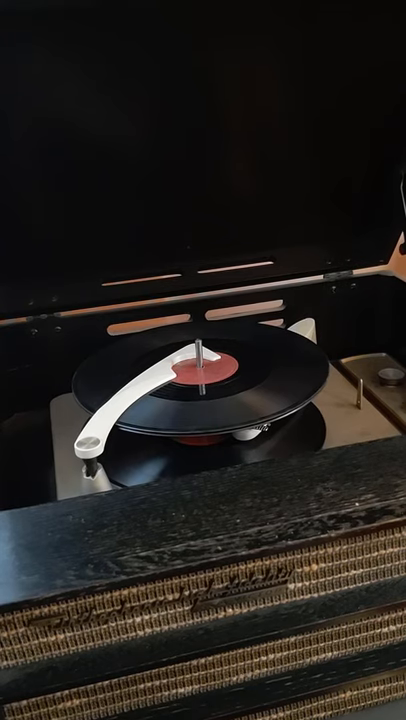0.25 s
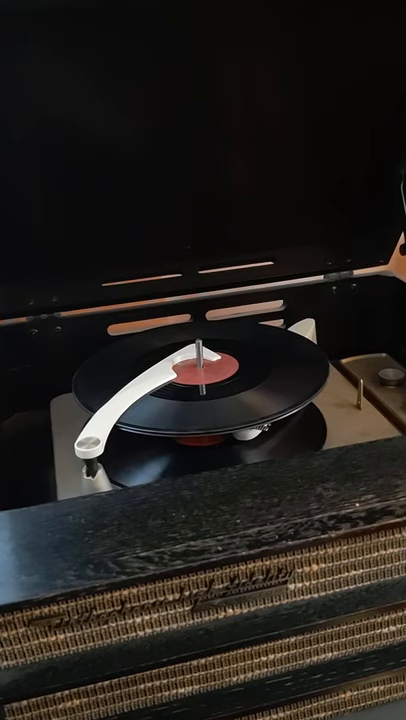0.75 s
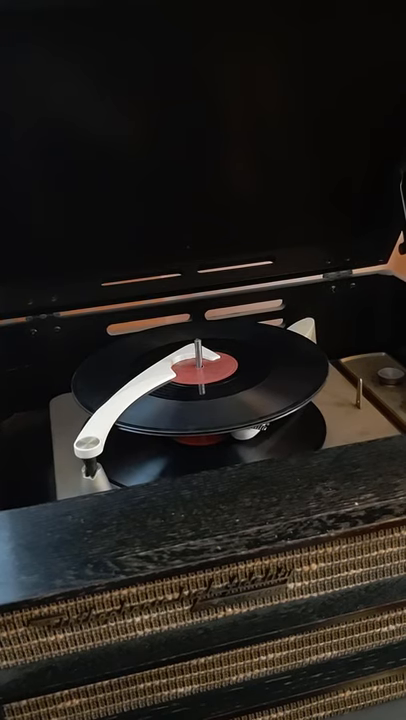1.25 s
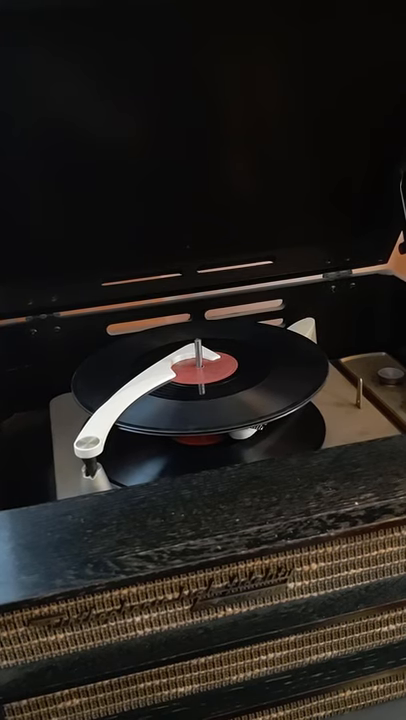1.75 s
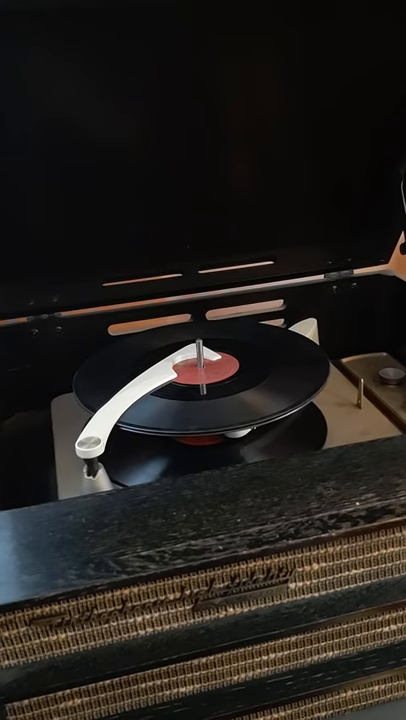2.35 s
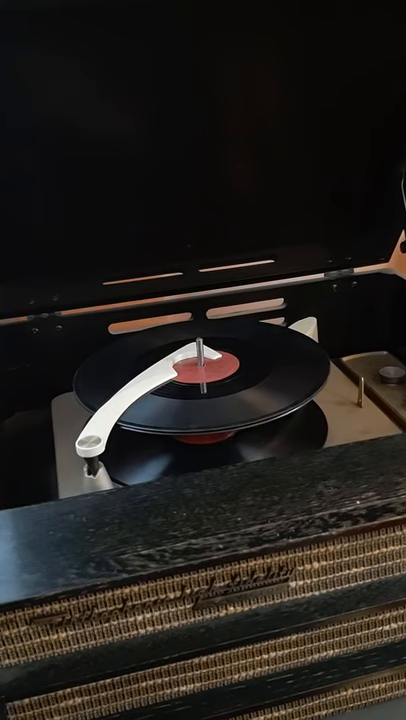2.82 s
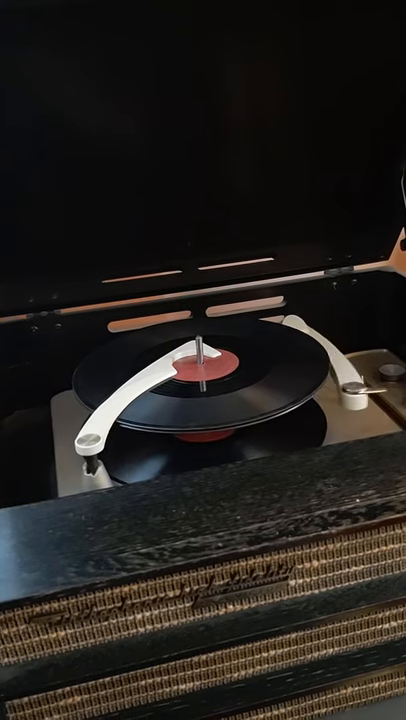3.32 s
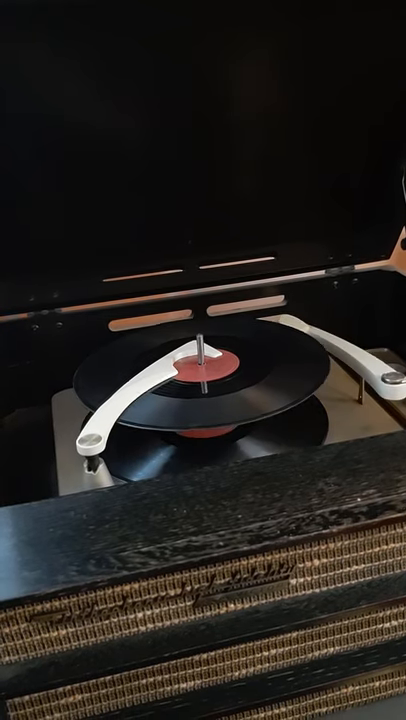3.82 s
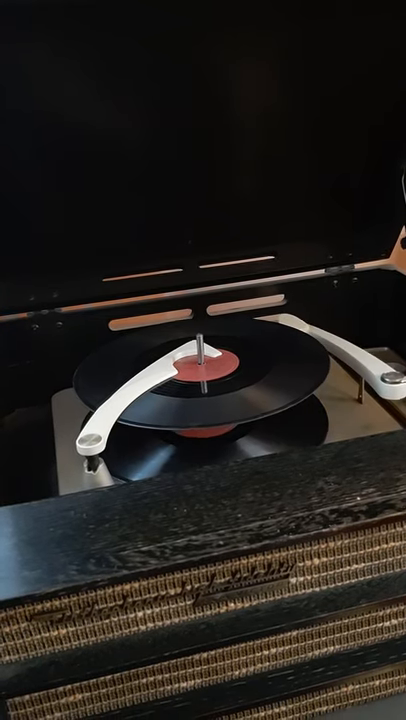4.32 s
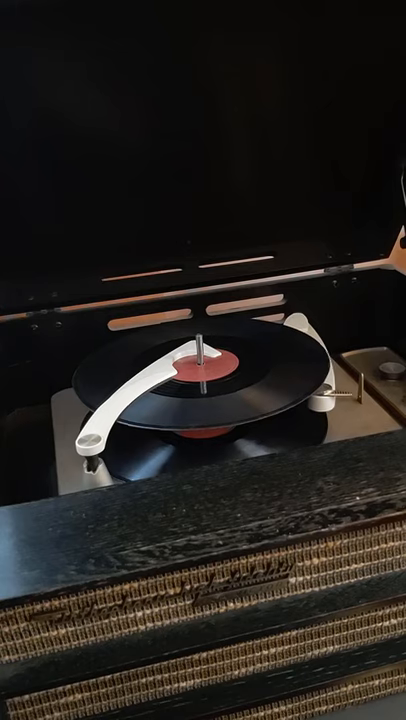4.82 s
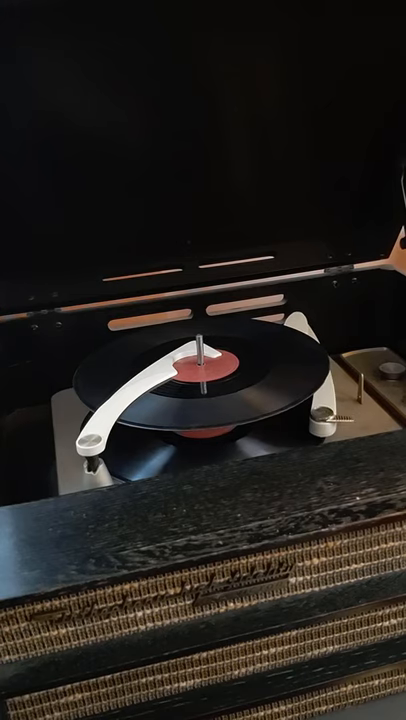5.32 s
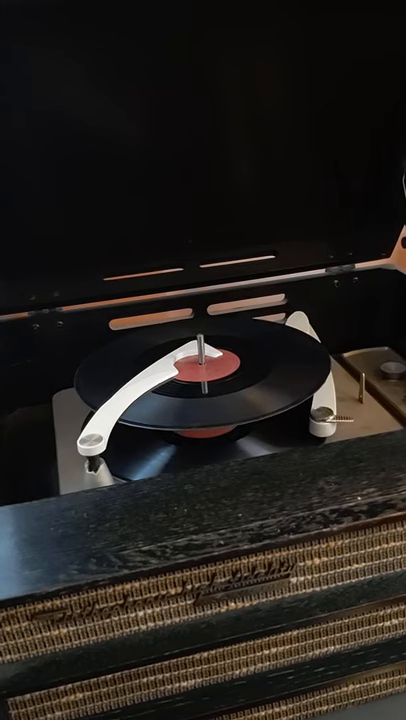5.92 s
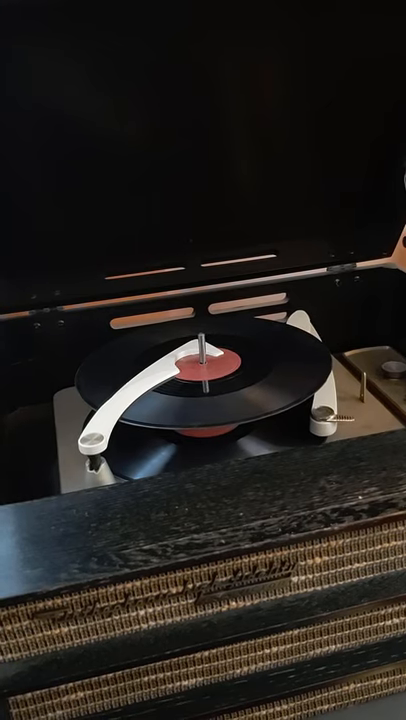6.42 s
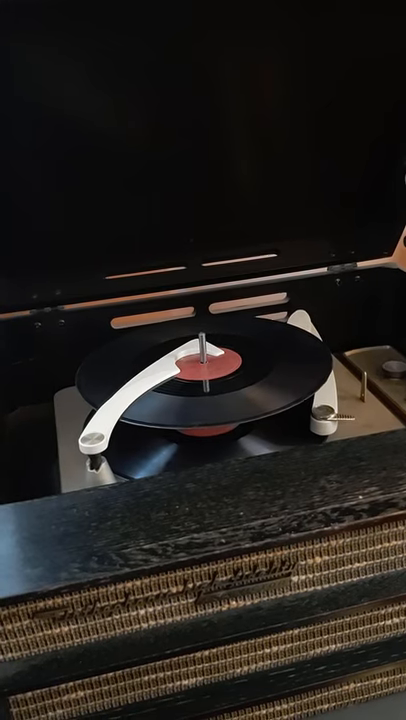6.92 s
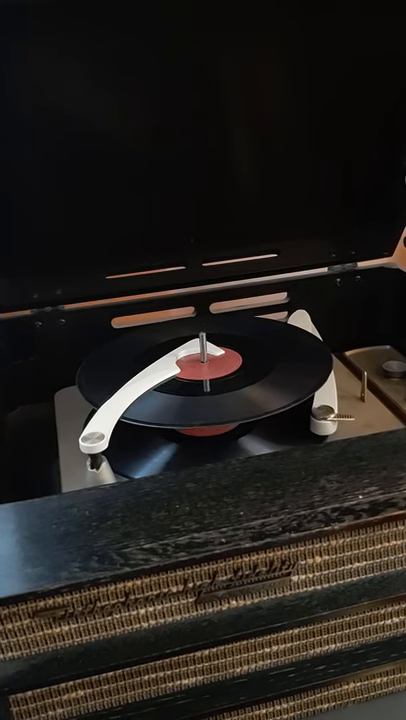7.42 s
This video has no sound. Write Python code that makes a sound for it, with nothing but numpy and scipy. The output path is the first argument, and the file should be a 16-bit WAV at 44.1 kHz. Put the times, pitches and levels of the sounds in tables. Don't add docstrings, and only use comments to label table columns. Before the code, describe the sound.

Low mains hum and motor rumble run throughout. Needle crackle with dull bumps grows into a rough, jerky drag across grooves with loud pops, then stops. Small metallic ticks lead to a double hard slap of a falling disc, which shivers flat. After sparse clicks, one sharp latch and a bassy needle thump bring quiet crackle and thin, fluttering metallic rubbing. Close stereo pickup, small dry room.

```python
import sys
import numpy as np
from scipy import signal
from scipy.fft import rfft, irfft, next_fast_len
from scipy.io import wavfile
from scipy.ndimage import uniform_filter1d

SR = 44100
rng = np.random.default_rng(int(sys.argv[2]) if len(sys.argv) > 2 else 0)


def dump_mix(stems):
    frames = np.atleast_2d(stems).T
    limited = np.clip(frames, -1, 1)
    pcm = np.round(limited * 32767).astype(np.int16)
    wavfile.write(sys.argv[1], SR, pcm)


def ratio(d):
    e = np.asarray(d, float) / 20
    return 10 ** e


N = 337532
GRID_HZ = np.fft.rfftfreq(16384, 1 / SR)
SIDES = np.array([[.5], [-.5]])
BASS_PAN_DB = -2
LIFT_S, SEAT_S = 2.64, 5.585
SETTLE_S = (3.932, 4.2)

# time in seconds, level in dB.
SCRATCH = [
    [(0.0, -59.5), (0.26, -54.5), (0.41, -66), (0.77, -60.5), (1.0, -58), (1.15, -61.5), (1.24, -101),
     (1.38, -64), (1.5, -104)],
    [(1.53, -62), (1.56, -56), (1.602, -79)],
    [(1.604, -46), (1.7, -49), (2.04, -44), (2.17, -39.5), (2.31, -43.5), (2.37, -40.5), (2.615, -38.5),
     (2.65, -47), (2.85, -69.5)],
    [(5.484, -53), (5.505, -72), (5.512, -51), (5.526, -58), (5.534, -62), (5.542, -56), (5.553, -52),
     (5.568, -48.5), (5.584, -36.5)],
    [(5.586, -50.5), (5.66, -56.5), (5.79, -58.5), (6.12, -58.5), (6.33, -66), (6.6, -69.5), (6.85, -68.5),
     (7.65, -67)],
]
# time in seconds, peak in dB, thump relative to it in dB.
POPS = [(0.0873, -38, 16), (0.177, -39, -22), (0.2292, -36.5, 2), (0.259, -37.5, 2), (0.7497, -41.5, 12),
        (0.8783, -41.5, 4), (0.9147, -41, 8), (0.9743, -39, -20), (1.0229, -38, -20), (1.143, -43, -18),
        (1.5632, -38, 19), (1.6064, -28.5, -20), (1.7805, -35, -10), (1.9592, -32, 26), (1.9933, -29.5, 12),
        (2.0678, -25.5, 10), (2.128, -26.5, 20.5), (2.181, -23.5, -16), (2.2747, -26.5, 7),
        (2.3185, -28.5, 0), (2.3401, -21.5, -10), (2.359, -23, -5), (2.479, -25.5, -8), (2.583, -22.5, 12),
        (5.4947, -43, -8), (5.7643, -37, -19), (5.983, -29.5, -20), (6.0812, -31.5, -20), (2.4334, -32, 19),
        (7.35, -35, 9), (0.108, -43, -2), (0.135, -42, -10), (0.208, -51, 0), (0.275, -42, -6),
        (0.472, -49.5, 0), (2.665, -45, -5), (0.835, -50, 4), (1.68, -54, 0), (1.718, -40, 17),
        (1.739, -36.5, 0), (1.835, -44, -3), (1.847, -42, 4), (1.937, -33, -2), (2.005, -46, 9),
        (2.026, -36.5, 29), (2.089, -35, 3), (2.097, -32, 6), (2.151, -33, 2), (2.161, -27.5, -7),
        (2.21, -30, 4), (2.237, -33, 4), (2.372, -23.5, 6), (2.56, -29, 19), (2.567, -30, -2),
        (2.629, -34, -4), (2.685, -37, -6), (5.522, -40, -10), (5.54, -40, -10), (5.555, -35, -8),
        (5.587, -41, 27.5)]
# crest in seconds, rumble in dB, dying time in seconds.
WARPS = [(0.0, -33.5, 0.0084), (0.116, -39.5, 0.087), (0.298, -46, 0.3), (1.0, -46.5, 0.11),
         (1.15, -44.5, 0.027), (1.76, -33.5, 0.031), (2.005, -25.5, 0.031), (2.144, -32.5, 0.053),
         (2.36, -28, 0.054), (2.46, -40, 0.049), (2.545, -40, 0.025), (2.67, -45.5, 0.073),
         (1.66, -36.5, 0.058), (2.075, -28.5, 0.033), (2.23, -39, 0.028), (0.89, -43.5, 0.023),
         (0.56, -46.5, 0.029), (5.789, -38, 0.035), (1.945, -30.5, 0.014), (6.55, -49, 0.012),
         (6.69, -49.5, 0.055), (7.01, -53, 0.69), (7.63, -51.5, 0.081)]
# start in seconds, rumble in dB, dying time in seconds.
JOLTS = [
    (0.803, -42.5, 0.17),
    (1.56, -37.5, 0.048),
    (1.605, -21.5, 0.018),
    (5.584, -31.5, 0.038),
]
# pitch in Hz, width in Hz, level in dB.
BASS = [(78, 128, -2), (110, 15.4, -0.5), (135, 39, 0.5), (177.3, 36, 0.5), (232.4, 27, -25),
        (251.4, 21.4, 0.5), (302.5, 32, 0.5), (414, 64, -12.5), (535, 76, -21)]
# pitch in Hz, width in Hz, level in dB.
CONE = [(438, 150, -4.5), (542.4, 30, 8), (670, 32, 1.5), (1120, 224, 1.5), (1310, 140, -2.5),
        (1660, 280, 0.5), (1903, 203, 8), (2080, 270, 2.5), (2396, 210, -0.5), (2744, 730, -6.5),
        (3280, 320, -9.5), (3800, 520, -30)]
# pitch in Hz, width in Hz, level in dB.
SNAP = [(492, 204, 6), (1270, 580, 6.5), (1950, 570, 12), (3200, 2500, -24.5)]
# frequency in Hz, left minus right in dB.
SPEAKER_PAN = [(60, -25), (130, 15.5), (290, -11.5), (640, 11), (1410, -17.5), (3100, 1), (6820, 11.5),
               (15000, -7)]

# time in seconds, level in dB.
RUB = [
    [(0.0, -67.5), (0.55, -71.5), (0.92, -65.5), (1.36, -71.5), (1.99, -66), (2.67, -67), (2.82, -83),
     (2.9, -73)],
    [(5.34, -73.5), (5.62, -61), (5.76, -58), (5.91, -58.5), (6.36, -63.5), (6.75, -62.5), (6.97, -64.5),
     (7.65, -62.5)],
]
# frequency in Hz, level in dB.
STACK_COLOUR = [(1650, -34.5), (2800, 6), (4000, 5.5), (5400, 2), (7000, -1), (9000, -2.5), (12000, -1),
                (15900, -8.5)]
# frequency in Hz, level in dB.
DROPPED_COLOUR = [(2000, -29), (3000, 2.5), (8000, 1.5), (15900, 3)]
# pitch in Hz, width in Hz, level in dB.
RUB_RINGS = [(3600, 120, -4), (4000, 110, 0), (4250, 200, -3), (4850, 150, -7), (5350, 110, -3),
             (5800, 300, -13), (6330, 150, -1), (6650, 120, -10), (7080, 110, -2), (7750, 130, -8),
             (8770, 130, -9), (9100, 100, -12), (9430, 100, -10), (9960, 130, -13), (10500, 200, -17),
             (11100, 130, -12), (11750, 200, -11), (12300, 200, -17), (13200, 180, -11), (13750, 220, -9),
             (14700, 150, -10), (15400, 500, -16)]
# frequency in Hz, left minus right in dB.
RUB_PAN = [(60, -13), (180, -25), (550, 8), (1650, -24), (4970, 4), (15000, -5.5)]
# time in seconds, level in dB.
SQUEAL = [(0.0, -82), (0.1, -63), (0.26, -65), (0.3, -71), (0.66, -62), (0.8, -70), (1.11, -70.5),
          (1.5, -73), (1.9, -88)]

# multiple of the mains frequency, rms in dB, left minus right in dB.
HUM = [(1, -68, -3), (2, -67.5, 0), (3, -64, -1.5), (4, -82.5, 6), (5, -59, -4.5), (7, -72.5, 4.5),
       (9, -88.5, 15.5), (11, -84, 13.5)]
# frequency in Hz, level in dB per Hz.
FLOOR = [(18, -52.5), (30, -22), (174, -13.5), (245, -12), (302, -15), (327, -17), (354, -19.5),
         (425, -14.5), (485, -21), (582, -18.5), (863, -27.5), (1950, -24.5), (2810, -34), (5280, -37.5),
         (15900, -46)]
# frequency in Hz, correlation from -1 to 1.
FLOOR_SAME = [(60, -0.0074), (150, 1), (380, 0.34), (950, 0.078), (2380, -0.28), (5980, -0.17),
              (15000, -0.58)]
# frequency in Hz, left minus right in dB.
FLOOR_PAN = [(60, -3.0), (150, -1.5), (380, -3.5), (950, -2.0), (2380, -5.5), (5980, 2.0), (15000, -2.0)]

# start in seconds, peak in dB, body
# relative in dB, ring in Hz.
TICKS = [(0.257, -51.5, 8, 1790), (0.634, -66, -5, 1940), (0.75, -56, 4, 1830), (0.9728, -53.5, 9.5, 1950),
         (1.49, -57, -13, 3920), (2.5504, -47.5, -12, 1920), (2.726, -54, 12.5, 1830),
         (3.0335, -58, -1.5, 2000), (3.0774, -60, -1, 1830), (3.152, -53, -6.5, 1900),
         (3.23, -66.5, 1, 1330), (3.345, -59, -24, 1810), (3.379, -59, -17, 2180), (3.468, -58, -7, 1560),
         (4.204, -62, 0, 991), (4.4013, -54.5, -5, 1860), (4.458, -55, -8, 2010), (4.527, -55, -25, 5200),
         (4.644, -52, -5, 1030), (4.776, -49.5, -4, 5200), (4.429, -59.5, -5, 7250),
         (4.6315, -63, -15, 5300), (5.196, -65.5, -11, 1830), (5.262, -74, -5, 1830),
         (2.865, -60.5, 7.5, 5200), (3.21, -61.5, 0.5, 2230), (0.0865, -55.5, 4, 1860),
         (0.18, -55.5, 5, 1900), (0.23, -55, 3, 1920), (0.462, -57, 1, 1900), (0.723, -60, 2, 1900),
         (0.805, -66, -5, 1880), (1.171, -69, -11, 1880), (2.578, -50, -12, 6340), (6.51, -57.5, 5, 1890),
         (6.79, -57, 4.5, 1900), (7.28, -57, 2, 1890), (4.9522, -59.5, 0, 1760), (5.145, -60, -1, 880),
         (5.2776, -65, 10.5, 1810), (5.305, -56.5, -4, 1105), (7.1274, -53, -18, 6340)]
# start in seconds, peak in dB, body and edge relative in dB, ring in Hz.
KNOCKS = [(1.533, -48, -5, -8, 1740), (2.8235, -50, 1.5, -3.5, 1505), (3.602, -40, -6.5, -8, 4190),
          (4.2925, -46, -1.5, -31, 1380), (4.282, -57, 3.5, -9, 3650), (5.984, -46.5, 8.5, -25, 3310),
          (3.666, -51, 8, -30, 1200), (3.679, -38.5, -10, -9.5, 4210), (4.6781, -33.5, -6.5, -7.5, 2200),
          (4.803, -46.5, 1.5, -7.5, 1714), (5.3547, -58, -19, 0.5, 3610), (5.4064, -54, -8, 8, 7200),
          (5.677, -28.5, -10.5, -5, 2670), (5.755, -41.5, -3, -5, 1770), (5.765, -39, 1, 1.5, 1830),
          (5.789, -49, 10, 5, 1880), (6.0815, -39.5, -7, -13, 4170), (7.3495, -43.5, -7, -16, 1850)]
# start in seconds, peak in dB, body and edge relative in dB,
# ring in Hz.
DROP = [(3.685, -20.5, -6, -1, 1830), (3.6988, -25, -7.5, -35.5, 1830), (3.6906, -24, -16.5, -4, 1720),
        (3.7105, -33, -0.5, -9.5, 1764), (3.724, -38.5, -3, -5.5, 1830), (3.748, -31, -3.5, -1.5, 1120),
        (3.8002, -21, -5, -5.5, 1720), (3.821, -34.5, 5, 2, 1720), (3.847, -31, -0.5, 3.5, 910),
        (3.907, -51.5, 12, 17, 1200), (3.9443, -36.5, 3, 2.5, 2955), (4.004, -35.5, -6, -1, 990),
        (4.035, -48, 7, -12, 1470), (4.047, -61, -1, -7, 1120), (4.058, -60, 13, -48, 900),
        (4.088, -44, -2, -25, 2230), (3.742, -29, -8, 2, 1680), (3.7925, -18.5, -5.5, 2, 1793),
        (3.8417, -26.5, -13, 4, 6340), (3.893, -38, 1, 11, 1210), (3.9367, -35, 0.5, 6.5, 2230),
        (3.9646, -29, -2, 2, 2210), (3.983, -34.5, -7, 5, 1950), (3.9947, -27.5, -7, -0.5, 2270),
        (4.022, -35.5, 3, 0, 2254)]
# time in seconds, level in dB.
SKID = [(3.681, -49), (3.79, -58), (3.87, -57), (3.93, -60), (4.045, -54.5), (4.13, -75)]
# start in
# seconds, pitch in Hz, level in dB, t60 in seconds.
LEVERS = [(4.294, 3610, -47, 0.045), (4.294, 2810, -53, 0.045), (4.293, 1690, -57, .15),
          (4.294, 2130, -56, .07), (4.46, 2140, -62, .06), (4.529, 5250, -65, 0.04), (4.679, 1825, -55, .2),
          (4.679, 4710, -51, 0.097), (4.679, 5416, -48, .09), (5.679, 2760, -38, 0.06),
          (4.679, 800, -52, 0.091), (4.803, 1830, -50, .15), (4.803, 2700, -58, .1),
          (5.677, 1965, -40, 0.11), (5.677, 3580, -31, 0.073), (5.677, 2274, -38, 0.05),
          (5.765, 603, -39, 0.13), (5.765, 776, -45.5, 0.092), (3.794, 1830, -30, .2),
          (3.685, 1817, -34, .2), (3.797, 814, -36, .08), (3.797, 324, -48, 0.1), (3.799, 1125, -32, .12),
          (5.514, 1900, -42, .12), (5.541, 1900, -42, 0.12)]
# frequency in Hz, level in dB per Hz.
RATTLE = [(71, -57.5), (120, -9), (301, -1), (742, -5.5), (1140, -0.5), (1620, 4), (1790, -3), (2480, -1.5),
          (7980, -8.5), (11500, -14.5), (16000, -19)]
# pitch in Hz, width in Hz, level above the rattle in dB.
PLATE = [(572, 35, 4), (910, 28, 2.5), (1133, 30, 2), (1203, 22, -1), (1510, 40, -1), (1720, 20, 4),
         (1830, 31, 12), (2230, 65, 9.5), (2955, 35, -1.5), (3498, 82, 3.5), (6340, 32, 9.5),
         (10600, 340, 4.5), (11450, 160, 6.5)]
# pitch in Hz, width in Hz, level in dB.
SETTLE = [(620, 62, -7), (900, 55, -15), (976, 55, 1.5), (1200, 65, -2.5), (1430, 85, -3),
          (1950, 120, -2.5), (2230, 89, 0.5), (2990, 83, -1.5), (3530, 210, -8.5), (3970, 110, -6),
          (4860, 380, -7.5), (5780, 220, -13), (6340, 87, -3.5), (7100, 260, -7)]
# frequency in Hz, left minus right in dB.
KNOCK_PAN = [(60, -3), (150, -1), (380, -5.5), (950, -0.5), (2380, -6), (5980, 4.5), (15000, -11)]

THUD_S = [
    3.797,
    5.586,
    5.589,
    1.607,
    1.93,
    3.94,
    1.995,
    2.556,
]
THUD_HZ = [147, 90, 160, 85, 85, 75, 165, 175]
# level in dB, t60 in seconds.
THUDS = [(-35.5, 0.12), (-29, 0.17), (-36, 0.079), (-29, 0.13), (-30, .2), (-56, .4), (-27, .13),
         (-29, .06)]


def evened(x):
    return x / np.sqrt(np.mean(x ** 2) + 1e-20)


def read(points, hz):
    f, value = np.transpose(points)
    return np.interp(np.log(hz + 1), np.log(f + 1), value)


def curves(tables):
    t = np.arange(N) / SR
    db = np.full(N, -120.)
    for s, level_db in map(np.transpose, tables):
        inside = (t >= s[0]) & (t <= s[-1])
        db[inside] = np.interp(t[inside], s, level_db)
    return uniform_filter1d(ratio(db), 200)


def humps(peaks, hz, steep):
    power = sum(ratio(2 * db) / (1 + (2 * (hz - f) / width) ** 2) ** steep for f, width, db in peaks)
    return 10 * np.log10(power + 1e-12)


def coloured(x, db):
    log_gain = np.log(ratio(np.maximum(db - db.max(), -100)))
    circle = np.concatenate([log_gain, log_gain[..., -2:0:-1]], axis=-1)
    taps = np.fft.ifft(np.exp(np.conj(signal.hilbert(circle)))).real[..., :4096]
    taps /= np.sqrt(np.mean((taps ** 2).sum(-1)))
    return signal.fftconvolve(np.atleast_2d(x), np.atleast_2d(taps), axes=1)[:, :N]


def echoes(x, t60, wet_db, delay_s, count, treble=1):
    size = SR // 2
    at = np.arange(0, size - 12, 12) + rng.integers(0, 12, (2, size // 12))
    tail = np.zeros((2, size))
    np.put_along_axis(tail, at, rng.choice([-1., 1.], at.shape), 1)
    t = np.arange(size) / SR
    dull = uniform_filter1d(tail, size=7)
    bright = tail - dull
    tail = dull * ratio(-60 * t / t60) + bright * ratio(-60 * t / (treble * t60))
    tail *= np.clip(t / delay_s, 0, 1)
    taps = ratio(wet_db) * tail / np.linalg.norm(tail, axis=1, keepdims=True)
    taps[0, 0] = taps[1, count] = 1
    return signal.fftconvolve(x * np.ones((2, 1)), taps / np.linalg.norm(taps[0]), axes=1)[:, :N]


def grit(per_s, spread_db, share):
    hit = rng.random(N) < per_s / SR
    size_db = spread_db * np.minimum(rng.exponential(1, N), 5)
    clicks = hit * ratio(size_db) * rng.choice([-1., 1.], N)
    return evened(share * evened(clicks) + (1 - share) * rng.standard_normal(N))


def two_sided(per_s, spread_db, share, same):
    left, other = grit(per_s, spread_db, share), grit(per_s, spread_db, share)
    return np.array([left, same * left + np.sqrt(1 - same ** 2) * other])


def swells():
    s, db, dying_s = np.transpose(WARPS + JOLTS)[..., None]
    rise = np.repeat([0.79, .02], [len(WARPS), len(JOLTS)])[:, None]
    t = np.arange(0, N, 32) / SR - s
    shape = np.exp(-np.abs(t) / (dying_s * np.where(t < 0, rise, 1)))
    return np.repeat((ratio(db) * shape).max(0), 32)[:N]


def loudspeaker():
    scratch = curves(SCRATCH)
    airborne = abs(np.arange(N) / SR - (SEAT_S + LIFT_S) / 2) < (SEAT_S - LIFT_S) / 2
    rumble = np.hypot(ratio(-8 - 28 * airborne) * scratch ** 0.71, swells())

    s, db, thump_db = np.transpose(POPS)
    at = np.round(s * SR).astype(int)
    pops, thumps = np.zeros((2, N))
    pops[at] = -ratio(db + 19.0)
    thumps[at] = -ratio(db + thump_db + 3.5)

    cut_db = -10 * np.log10(1 + (80 / (GRID_HZ + 1)) ** 12)
    pan_db = SIDES * read(SPEAKER_PAN, GRID_HZ)
    bass_db = humps(BASS, GRID_HZ, 1.42) + cut_db + SIDES * BASS_PAN_DB
    low = coloured(ratio(-0.5) * rumble * grit(500, 1.8, 0.47) + thumps, bass_db)
    surges = ratio(0.71 * evened(uniform_filter1d(rng.standard_normal(N), size=500)))
    scrape = ratio(3.5) * scratch * surges * grit(1100, 2.1, .65)
    high = coloured(scrape, humps(CONE, GRID_HZ, 1.8) + pan_db)
    snaps = coloured(pops, humps(SNAP, GRID_HZ, 3.04) + pan_db)

    out = echoes(low, .15, -15, .006, count=0)
    out += echoes(high, .15, -4, .004, count=14)
    return out + echoes(snaps, .15, -10, .004, count=14)


def spindle():
    squeal = curves([SQUEAL]) * rng.standard_normal((2, N))
    out = coloured(squeal, humps([(15700, 330, 0)], GRID_HZ, 0.91))
    flutter = ratio(2.7 * evened(uniform_filter1d(rng.standard_normal(N), 900)))
    rings_db = humps(RUB_RINGS, GRID_HZ, 1.2)
    for level, colour, ring_depth in zip(RUB, (STACK_COLOUR, DROPPED_COLOUR), (.55, 1)):
        path_db = read(colour, GRID_HZ) + ring_depth * rings_db + SIDES * read(RUB_PAN, GRID_HZ)
        friction = curves([level]) * flutter * two_sided(1000, 1.6, 0.35, 0.099)
        out += ratio(2.5) * echoes(coloured(friction, path_db), .1, -8, .002, count=5)
    return out


def hum():
    mains_hz, waver_db = 60.0, 0.28
    t, out = np.arange(N) / SR, np.zeros((2, N))
    for k, db, pan_db in HUM:
        phase, *drift = rng.random(4)
        waver = sum(np.sin(2 * np.pi * (rate * t[::64] + d)) for rate, d in zip((.7, 2.3, 6.1), drift))
        level = np.repeat(ratio(db + waver_db * k * waver), 64)[:N]
        tone = np.sin(2 * np.pi * (k * mains_hz * t + phase))
        out += np.sqrt(2) * level * ratio(SIDES * pan_db) * tone
    return out


def background():
    hz = np.fft.rfftfreq(N, 1 / SR)
    a, b = rfft(rng.standard_normal((2, N)))
    same = read(FLOOR_SAME, hz)
    pair = np.array([a, same * a + np.sqrt(1 - same ** 2) * b])
    gain = ratio(read(FLOOR, hz) + SIDES * read(FLOOR_PAN, hz))
    return ratio(-61.5) * evened(irfft(pair * gain, N))


def strikes():
    rows = [(s, db, body, edge, 0.097, hz) for s, db, body, edge, hz in DROP]
    rows += [(s, db, body, edge, 0.088, hz) for s, db, body, edge, hz in KNOCKS]
    return rows + [(s, db, body, -9, 0.095, hz) for s, db, body, hz in TICKS]


def levers():
    out, t = np.zeros(N), np.arange(SR // 5) / SR
    for s, hz, db, t60 in LEVERS:
        rough = 1 + 0.75 * evened(uniform_filter1d(rng.standard_normal(len(t)), size=150))
        envelope = (1 - np.exp(-t / 0.0012)) * rough * ratio(db - 60 * t / t60)
        start = round(s * SR)
        out[start:start + len(t)] += envelope * np.sin(2 * np.pi * hz * t)
    return out


def split(noise):
    size = next_fast_len(N, True)
    hz = np.fft.rfftfreq(size, 1 / SR)
    below_3k, below_8k = (1 / (1 + (hz / edge_hz) ** 6) for edge_hz in (3000, 8000))
    masks = (below_3k, below_8k - below_3k, 1 - below_8k)
    spectrum = rfft(noise, size)
    return np.array([evened(irfft(spectrum * mask, size)[:, :N]) for mask in masks])


def rattling():
    grains = two_sided(3000, 2.6, .6, .55)
    pan_db = SIDES * read(KNOCK_PAN, GRID_HZ)
    loose_db = read(RATTLE, GRID_HZ) + np.clip(humps(PLATE, GRID_HZ, 1.1), -2, 9)
    rattle = coloured(grains, loose_db + pan_db)
    valley_db = loose_db - 9 + 8 * (GRID_HZ > 8000)
    gaps_db = sum(-18 * np.exp(-((GRID_HZ - hz) / 110) ** 2) for hz in (3270, 4380, 5400))
    shiver_db = np.maximum(humps(SETTLE, GRID_HZ, 1.1), valley_db) + gaps_db
    shiver = coloured(grains, shiver_db + pan_db)
    settling = slice(*(round(s * SR) for s in SETTLE_S))
    rattle[:, settling] = shiver[:, settling]
    return rattle


def changer():
    powers, rings = np.zeros((3, N)), np.zeros(N)
    for s, db, body_db, edge_db, t60, hz in strikes():
        start = round(s * SR)
        t = np.arange(min(SR // 5, N - start)) / SR
        span = slice(start, start + len(t))
        rise = (1 - np.exp(-t / .0013)) * (1 + .7 * np.exp(-t / .005))
        for k, (rel_db, longer) in enumerate(((body_db, 1.3), (0, 1), (min(edge_db, 6), .8))):
            powers[k, span] += (rise * ratio(db + rel_db - 3.0 - 60 * t / (longer * t60))) ** 2
        ring_db = db + (body_db if hz < 3000 else 0) - 2.5
        pair = np.sin(2 * np.pi * hz * t) + 0.8 * np.sin(2 * np.pi * 1.04 * hz * t)
        rings[span] += rise * ratio(ring_db - 60 * t / (.6 * t60)) * pair
    skid = curves([SKID])
    for k, gain in enumerate((ratio(13.5), 0.23, 0.44)):
        powers[k] += (gain * skid) ** 2
    bursts = (split(rattling()) * np.sqrt(powers)[:, None]).sum(0)
    cabinet = echoes(bursts + rings + levers(), .04, -7, .001, count=4)
    return echoes(cabinet, 0.34, -9.0, 0.016, count=0, treble=0.73)


def thuds():
    out, t = np.zeros(N), np.arange(SR // 2) / SR
    for s, hz, (db, t60) in zip(THUD_S, THUD_HZ, THUDS):
        start = round(s * SR)
        envelope = (1 - np.exp(-t * hz)) * ratio(db + 3 - 60 * t / t60)
        out[start:start + len(t)] += envelope * np.sin(2 * np.pi * hz * t)
    return ratio(SIDES * BASS_PAN_DB) * out


def scene():
    return loudspeaker() + spindle() + hum() + background() + changer() + thuds()


def band_limit(x):
    return signal.sosfilt(signal.butter(12, 16800, fs=SR, output="sos"), x)


def record(dry):
    size = next_fast_len(N, True)
    hz = np.fft.rfftfreq(size, 1 / SR)
    overloaded = .5 * np.tanh(2 * dry)
    limit = ratio(-np.clip((hz - 15730) / 3, 0, 45))
    limited = irfft(rfft(overloaded, size) * limit, size)[:, :N]
    return band_limit(limited)


dry = scene()
out = record(dry)
dump_mix(out)
```